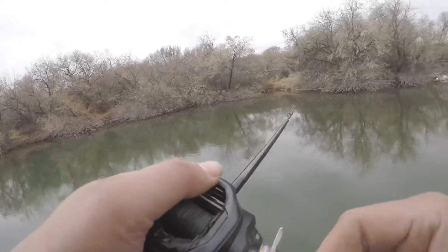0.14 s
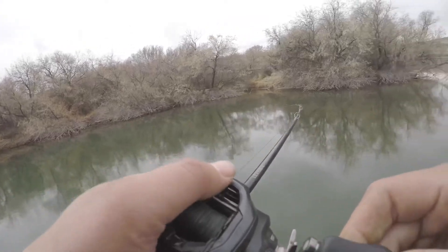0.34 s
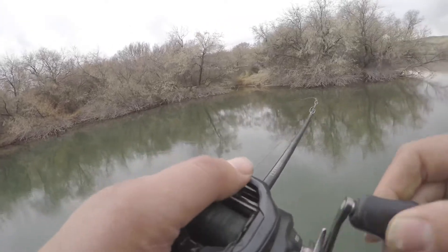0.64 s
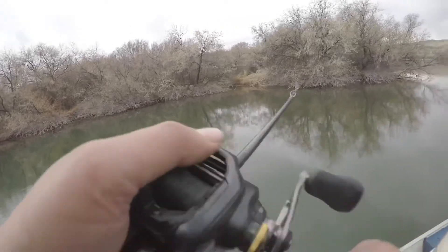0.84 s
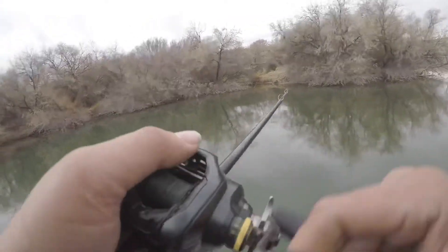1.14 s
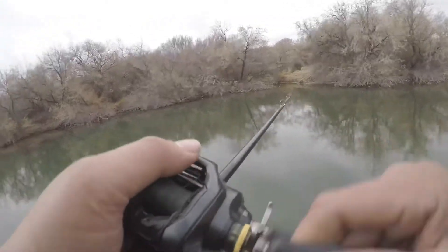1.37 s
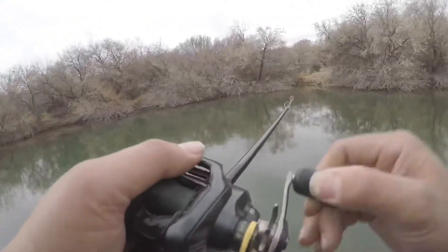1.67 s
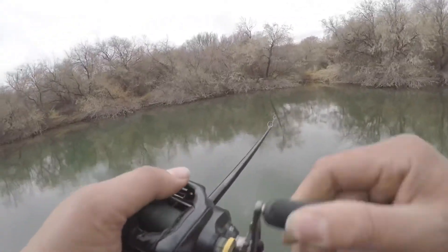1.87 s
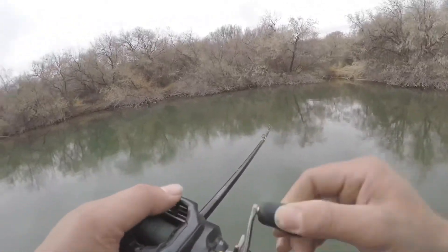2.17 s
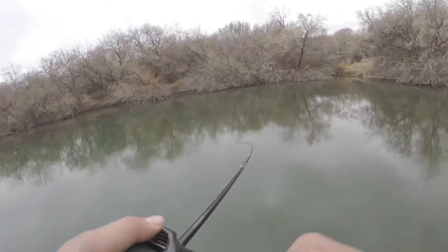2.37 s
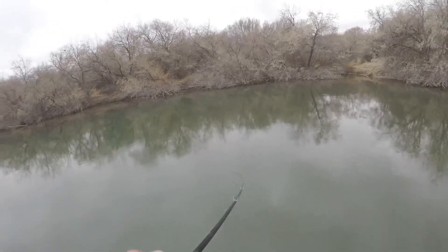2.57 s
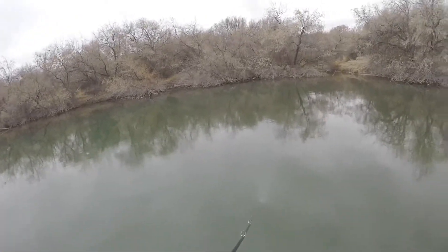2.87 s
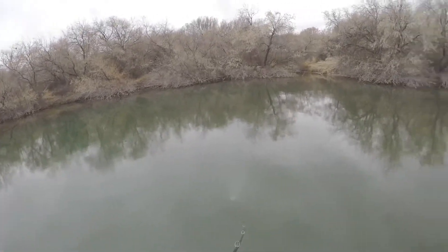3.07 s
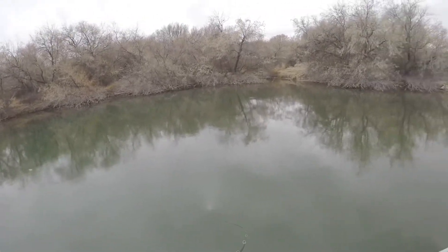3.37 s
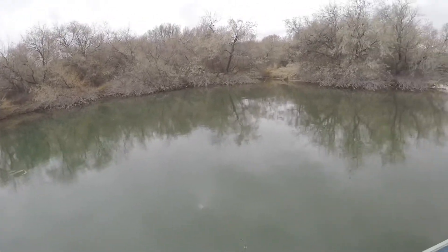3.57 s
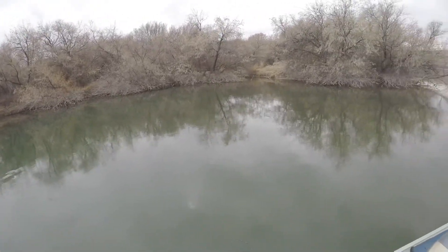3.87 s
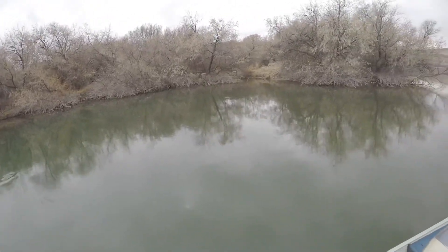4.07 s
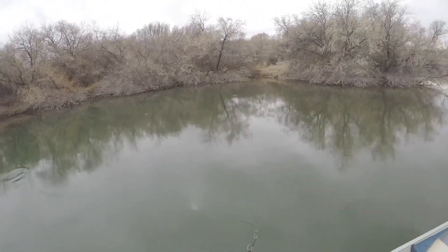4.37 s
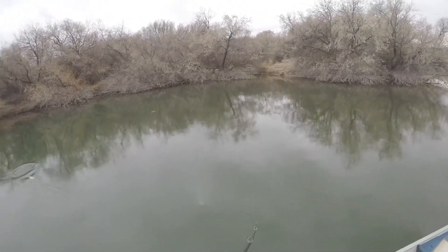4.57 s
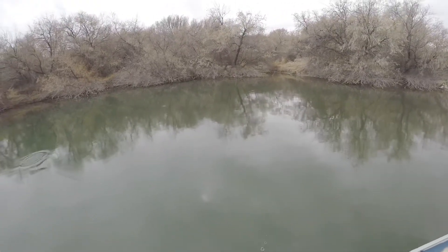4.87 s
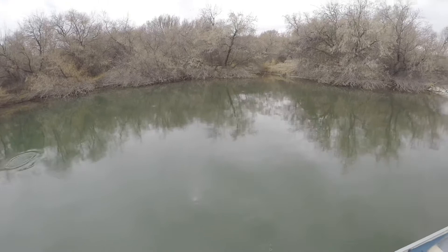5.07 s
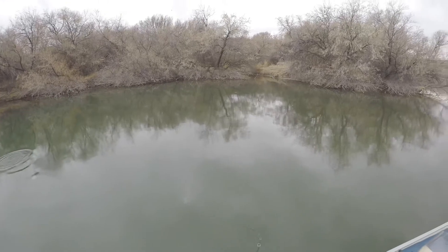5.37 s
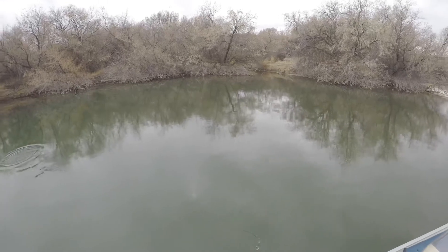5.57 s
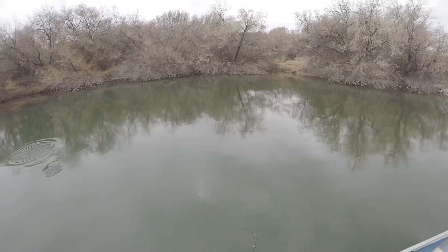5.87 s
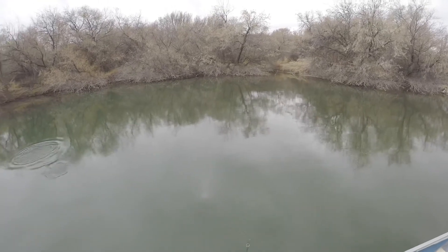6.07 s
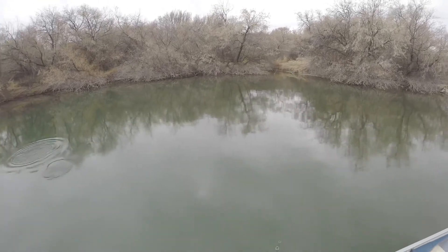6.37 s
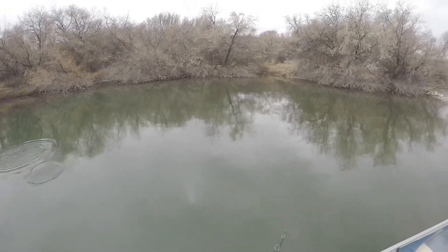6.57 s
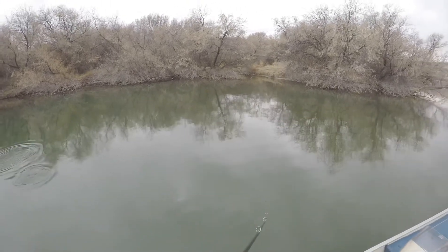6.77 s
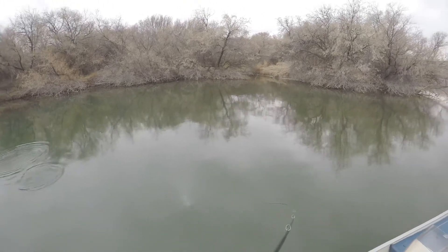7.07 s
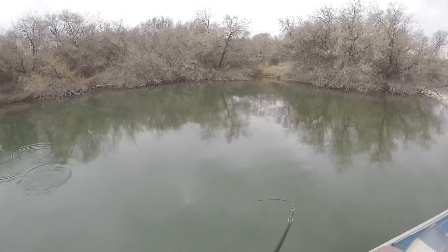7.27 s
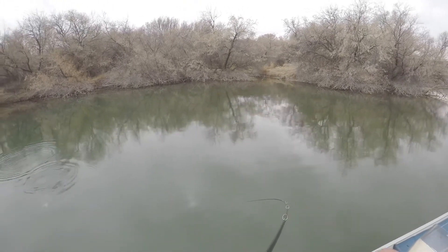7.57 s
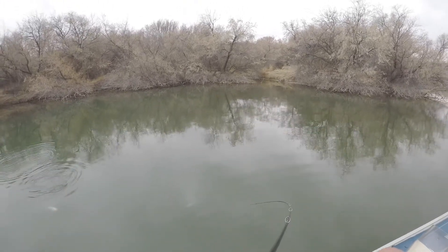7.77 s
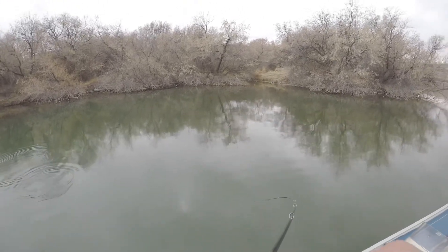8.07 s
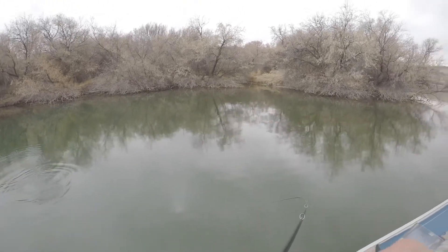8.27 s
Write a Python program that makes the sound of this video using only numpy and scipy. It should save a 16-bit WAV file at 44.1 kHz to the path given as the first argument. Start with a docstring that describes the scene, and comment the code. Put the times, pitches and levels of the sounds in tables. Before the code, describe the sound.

A fishing reel cranks fast with a squealing, grinding whir, then briefly slower, amid wind rumble, clicks, dull knocks and faint birds on quiet water.

```python
"""Fishing reel cranked on a boat

A baitcasting reel is cranked close to the microphone, on a quiet river. Its gear whine is a sine at the
tooth-meshing rate with lower and upper partners, swept by each push and rung through the frame's resonances.
Squeals, pings and a bearing whistle are sines; ticks, rattles, line hiss and scrapes are shaped noise; knocks
mix both. A slower spell of cranking follows the fast one. Gliding sines make the faint birds on the bank and
one rising reel whine at 4.89 s; coloured noise makes the wind rumble, the low roar and the far hiss."""
import sys
import numpy as np
from scipy import signal
from scipy.fft import rfft, irfft, next_fast_len
from scipy.io import wavfile
from scipy.ndimage import uniform_filter1d

SR = 44100
rng = np.random.default_rng(int(sys.argv[2]) if len(sys.argv) > 2 else 0)


def inscribe(sig):
    """Save sig as 16-bit PCM at rate SR to the path in sys.argv[1].

    A 1-D sig is mono; a 2-D sig holds one channel per row.
    Samples are clipped to [-1, 1] before scaling.
    """
    pcm = np.round(np.clip(np.atleast_2d(sig).T, -1, 1) * 32767)
    wavfile.write(sys.argv[1], SR, pcm.astype(np.int16))


N = 371763
T = np.arange(N) / SR  # s
BINS_HZ = abs(np.fft.fftfreq(8192, 1 / SR))

# pushes on the handle: full_speed_s, hold_s, mesh_hz, coast_s (to 1/e)
PUSHES = [(0.613, 0.018, 3590, 0.026), (.684, 0.0055, 5240, 0.035), (.804, 0.011, 5454, 0.047),
          (0.843, 0.017, 6140, .028), (0.933, 0.03, 5287, .04), (1.048, .016, 5600, .035),
          (1.088, 0.016, 5283, 0.03), (1.165, 0.019, 5500, 0.058), (1.286, 0.0027, 6475, 0.021),
          (1.307, 0.03, 5230, 0.029), (1.394, .018, 5440, 0.044), (1.51, 0.011, 5474, 0.061),
          (1.635, 0.0083, 5040, .05), (1.742, .008, 5170, 0.068), (1.891, 0.0044, 5170, .034),
          (2.002, .052, 4365, 0.026), (2.1, .01, 2700, .04), (2.168, 0.0057, 4425, .022),
          (2.275, 0.023, 4237, .04), (2.406, 0.011, 2916, .03), (2.461, .018, 3810, 0.021),
          (4.155, 0.0076, 3750, .045), (4.215, 0.015, 2450, 0.086), (4.3, .02, 2787, .04),
          (4.33, 0.033, 3394, 0.032), (4.409, 0.12, 2750, .075), (5.101, 0.17, 2250, 0.072)]
# gear sound level, set by force on the handle, fast and slow spell: time_s, level_db
FAST_FORCE = [(0.45, -63.5), (.56, -49), (.66, -41.5), (1.35, -40.5), (1.751, -42.5), (2.02, -44.5),
              (2.12, -46), (2.3, -47), (2.51, -48.5), (2.579, -52.5), (2.7, -79)]
SLOW_FORCE = [(3.999, -60), (4.125, -52.5), (4.155, -48.5), (4.58, -52.5), (4.658, -54), (4.95, -56),
              (5.261, -55.5), (5.35, -80)]
# meshing rate between pushes, time to speed up (to 1/e)
FAST_IDLE_HZ, FAST_RISE_S = 2230, .019
SLOW_IDLE_HZ, SLOW_RISE_S = 1706, .035
# pitch of the lower whine and of the grinding, as shares of the meshing rate
LOW_MESH, GRIND_MESH = .46, .76
# reel frame resonances: pitch_hz, width_hz (near the -3.7 dB points), relative_db
FRAME = [(2240, 150, 1), (2344, 72, -0.5), (2673, 16, 3), (3297, 40, -0.5), (3415, 60, 6.5),
         (3656, 62, 2.5), (3935, 230, -4.5), (4160, 41, -2.5), (4527, 47, -0.5), (4820, 45, 0.5),
         (5306, 120, -4.5), (5260, 1150, -8.5), (6050, 45, 0), (6500, 35, -1.5), (6640, 480, -5)]
# reel radiation beside the resonances: freq_hz, relative_db
SHELL = [(300, -63), (700, -9.5), (1400, -15), (1900, -8), (2900, -12.5), (5000, -13), (5800, -44),
         (7500, -15.5), (9700, -19), (11200, -27.5), (13500, -32), (15000, -39)]
# gears catch and squeal: start_s, length_s, level_db, pitch_hz
SQUEALS = [(0.697, 0.03, -43, 2200), (.722, 0.012, -49, 3430), (0.807, 0.01, -41, 2330),
           (0.827, .015, -46, 2280), (0.863, 0.031, -43.5, 2230), (0.887, 0.012, -39.5, 3440),
           (0.935, 0.012, -38.5, 3360), (0.967, 0.027, -43, 2225), (1.074, 0.023, -45, 2313),
           (1.112, 0.015, -42, 2250), (1.124, 0.044, -43.5, 3450), (1.158, .014, -39, 2282),
           (1.285, 0.011, -35.5, 3384), (1.328, .008, -40, 5160), (1.379, .009, -42, 3400),
           (1.64, .014, -44, 2300), (1.663, 0.038, -39, 3484), (1.861, 0.022, -40, 3410),
           (1.893, .02, -55, 2227), (1.909, 0.022, -40.5, 3470), (1.94, 0.046, -40, 3440),
           (2.113, 0.027, -49.5, 2333), (2.21, .03, -54, 2702), (2.316, 0.027, -46, 3430),
           (2.388, 0.027, -55, 2690), (2.427, .018, -50, 3430), (2.458, .022, -54, 3440),
           (2.491, 0.045, -51, 2230), (4.152, 0.017, -44, 3620), (4.228, 0.028, -54, 2250),
           (4.301, .02, -45.5, 2686), (4.424, 0.031, -48, 2770), (4.507, .04, -50, 2730),
           (4.565, 0.037, -51, 2270), (5.065, 0.04, -46, 3480)]
# bearing whistle, mean course: time_s, pitch_hz, level_db
BEARING = [(1.5, 6800, -75), (1.65, 6745, -52.5), (1.78, 6644, -50.5), (2.05, 6550, -59.5),
           (2.52, 6470, -57), (2.65, 6500, -97)]
# spool pings, gain on the rim modes: start_s, gain_db
PINGS = [(2.262, -56), (2.294, -50), (2.334, -51), (2.388, -51), (2.46, -58)]
# spool rim modes: pitch_hz, relative_db, t60_s
RIM = [(10420, -2, 0.038), (14300, -9, 0.023)]
# reel ticks: start_s, peak_db, treble_db (reached at 6.5 kHz)
TICKS = [(0.3065, -36.5, -12), (0.722, -40, 1), (0.8034, -38, -10), (2.878, -39.5, -24), (2.938, -40, -15),
         (4.201, -35, -19), (5.075, -30, -7), (5.078, -31, -8), (5.1786, -37.5, -22), (5.7762, -33.5, -20),
         (5.9202, -37, -15), (6.067, -43, -22), (6.122, -48, -19), (6.3425, -39.5, -27),
         (6.524, -35.5, -11), (6.625, -36, -27), (6.737, -50, -30), (6.975, -41, -12), (7.39, -43, -14),
         (7.8223, -38.5, -23), (7.836, -35, -14), (7.858, -54, -23), (8.034, -49, -6), (8.117, -41, -16)]
# tick spectrum: freq_hz, relative_db
TICK_COLOUR = [(500, -13), (1500, -20.5), (2400, -9), (3500, -11), (4800, -14), (7000, -11), (10000, -25),
               (15000, -37)]
# chance of small rattles: time_s, clicks_per_s
RATTLE_RATE = [(0, 3), (2.5, 8), (3.2, 3), (4, 8), (4.3, 40), (5.2, 30), (5.4, 6), (6, 22), (6.9, 20),
               (8.43, 14)]
# line through the rod guides: middle_s, length_s, level_db
LINE_RUNS = [(2.7, 0.65, -62.5), (4.325, 0.16, -54), (4.521, 0.21, -55.5), (4.763, 0.13, -60.5),
             (4.923, 0.23, -55), (5.245, 0.42, -67), (6.678, 0.26, -56), (7.313, 0.27, -57.5),
             (7.596, 0.14, -63), (8.34, 0.28, -61)]
LINE_REST_DB = -63.5
# wet line hiss spectrum: freq_hz, relative_db
LINE_COLOUR = [(600, 0), (1500, 14), (2300, 8.5), (3000, 7), (4500, 7.5), (5600, -5), (6700, 3),
               (9000, -17), (11000, -21), (15000, -13.5)]
# dull knocks of hands and rod: start_s, peak_db (before the common trim), pitch_hz
KNOCKS = [(2.617, -22.5, 127), (2.73, -28, 185), (2.789, -23.5, 128), (2.829, -30.5, 132),
          (3.034, -25.5, 212.7), (4.082, -25, 164), (4.129, -23.5, 323), (4.145, -23, 195.2),
          (4.915, -31.5, 153), (5.077, -25, 175.5), (6.041, -28.5, 171), (7.562, -28.5, 471),
          (7.864, -26.5, 181), (8.047, -31, 222)]
# spectrum of the rub in a knock: freq_hz, relative_db
KNOCK_COLOUR = [(60, -28), (150, 13.5), (350, 0.5), (600, -21), (1200, -19.5), (2500, -36), (6000, -37),
                (12000, -80)]
# hand scrapes on the grip: start_s, length_s, level_db
SCUFFS = [(2.605, 0.023, -51.5), (2.711, 0.05, -49), (4.126, 0.067, -46.5), (4.887, 0.054, -53)]
# scrape spectrum: freq_hz, relative_db
SCUFF_COLOUR = [(150, -28), (350, 20), (700, -3), (1200, 5.5), (2200, -6), (4000, -12), (9000, -39)]
# gliding whistles, birds on the bank and one rising reel whine at 4.89 s:
# start_s, length_s, level_db (before flutter and echo), start_hz, middle_hz, end_hz
WHISTLES = [(2.62, 0.045, -60.5, 2700, 2520, 2600), (2.9, 0.04, -67.0, 3400, 3700, 4150),
            (2.98, 0.14, -72.5, 4700, 4800, 4950), (3.118, 0.025, -74.5, 5100, 5450, 5500),
            (3.13, 0.035, -67.5, 3850, 3700, 3750), (3.245, 0.028, -70.0, 4150, 4400, 4450),
            (3.266, 0.034, -63.0, 3300, 3520, 3560), (3.298, 0.048, -64.0, 2900, 3180, 3220),
            (3.535, 0.11, -72.5, 6680, 6620, 6560), (4.89, 0.04, -53.0, 1400, 1640, 1780),
            (5.223, 0.054, -66, 4650, 5400, 6500), (5.27, 0.04, -60.5, 1750, 1620, 1400),
            (5.27, 0.048, -61.5, 3350, 3780, 3800), (5.398, 0.062, -66.5, 4800, 5350, 5850),
            (5.465, 0.04, -66.0, 2640, 2500, 1900), (5.47, 0.03, -62.0, 1700, 1580, 1400),
            (5.485, 0.035, -69, 3650, 3800, 4050), (5.618, 0.035, -66.5, 3900, 3850, 3550),
            (6.03, 0.028, -58.0, 2290, 2200, 1970), (6.245, 0.035, -69, 3620, 3750, 3820),
            (6.362, 0.025, -63.5, 3320, 3280, 2700), (6.376, 0.037, -53.0, 2710, 2600, 2450),
            (6.41, 0.045, -61.5, 2200, 2000, 1700), (6.47, 0.055, -66, 2120, 1930, 1800),
            (6.945, 0.045, -63.5, 3700, 3870, 3600), (7.02, 0.058, -64.5, 2420, 2270, 1800),
            (7.072, 0.028, -60.5, 2480, 2380, 2300), (7.102, 0.042, -55.5, 2420, 2580, 2560),
            (7.153, 0.025, -62.0, 2600, 2660, 2640), (7.185, 0.035, -64.5, 2560, 2600, 2680),
            (7.22, 0.085, -55.5, 2470, 2450, 2620), (7.325, 0.03, -65, 4050, 4300, 4400),
            (7.505, 0.045, -63.5, 2850, 2920, 2920), (7.54, 0.065, -64.5, 4100, 3980, 3820),
            (7.542, 0.036, -59.0, 2900, 2630, 2100), (7.583, 0.04, -60.0, 2170, 2330, 2650),
            (7.628, 0.032, -60.5, 2380, 2310, 2100), (7.668, 0.055, -63.5, 2280, 2350, 2230),
            (7.672, 0.035, -68.0, 3920, 4010, 4030), (7.773, 0.028, -66.5, 4160, 4030, 3820),
            (8.04, 0.055, -61.5, 2940, 3020, 3030), (8.085, 0.045, -56.0, 3030, 3170, 3080),
            (8.12, 0.033, -56.5, 2800, 2520, 2120), (8.168, 0.042, -59.5, 2430, 2550, 2470),
            (8.208, 0.03, -63.5, 2250, 2150, 1900), (8.356, 0.059, -66, 6400, 6400, 6200)]
# wind strength at the microphone, before gusts: time_s, level_db
WIND = [(0, -31), (.16, -31.5), (.48, -39.5), (.72, -27.5), (1.35, -26), (1.8, -29), (2.6, -35), (3.2, -39),
        (3.85, -48), (4.4, -40), (5.1, -44), (5.5, -48.5), (5.9, -53), (6.2, -41.5), (6.34, -35.5),
        (6.45, -40), (6.8, -39.5), (7.4, -45.5), (7.75, -52), (8.34, -48), (8.43, -27.5)]
# large wind eddies, spectrum: freq_hz, relative_db
BUFFET = [(4, -9), (16, 1.5), (27, -1), (40, -3), (55, -11.5), (80, -19.5), (160, -49), (600, -110)]
# smaller eddies on each gust, spectrum: freq_hz, relative_db
FLUTTER = [(25, -17.5), (50, 0), (80, 4), (110, -2), (160, -12.5), (260, -18), (600, -101)]
# low roar over the river, spectrum: freq_hz, relative_db
ROAR_COLOUR = [(70, -23), (105, -13), (135, 2), (200, -4), (300, -6), (450, -9), (700, -15.5), (1100, -26),
               (2000, -42), (5000, -86)]
# far hiss, spectrum: freq_hz, relative_db
AIR_COLOUR = [(300, 1), (900, -1), (1500, -3), (2500, -4.5), (4000, -11.5), (6000, -13), (8000, -12),
              (10000, -11), (11500, -17.5), (13500, -20), (15000, -46)]
ROAR_DB, AIR_DB = -44.5, -57.5
EDGE_HZ = 15310


def amp(db):
    """Decibels to gain."""
    return 10 ** (np.asarray(db) / 20)


def evened(x):
    """Scales to rms 1."""
    return x / np.sqrt(np.mean(x ** 2) + 1e-20)


def curve(rows):
    """Joins (time_s, value) rows by straight lines."""
    return np.interp(T, *np.transpose(rows))


def add(mix, start_s, sound):
    """Mixes a sound in at start_s."""
    part = mix[max(round(start_s * SR), 0):][:len(sound)]
    part += sound[:len(part)]


def shape(points):
    """Gain per bin from (freq_hz, db) points, straight in log frequency."""
    hz, db = np.transpose(points)
    return amp(np.interp(np.log(BINS_HZ + 1), np.log(hz), db))


def causal(x, gain):
    """Minimum-phase filter with the given gain per bin."""
    spectrum = np.exp(np.conj(signal.hilbert(np.log(gain + 1e-6))))
    taps = np.fft.ifft(spectrum).real
    return signal.oaconvolve(x, taps[:len(taps) // 2])[:len(x)]


def colour(x, points):
    """Filters x to the (freq_hz, db) shape."""
    return causal(x, shape(points))


def noise(points):
    """Coloured noise of rms 1."""
    return evened(colour(rng.standard_normal(N), points))


def wander(rate_hz):
    """Smooth random drift of rms 1, 12 dB down at rate_hz."""
    size = next_fast_len(N)
    hz = np.fft.rfftfreq(size, 1 / SR)
    lowpass = 1 / (1 + (hz / rate_hz) ** 2) ** 2
    return evened(irfft(rfft(rng.standard_normal(size)) * lowpass, size)[:N])


def meshing(idle_hz, rise_s, roundness=1.2):
    """Meshing rate in Hz: each push speeds the gears up, holds them, lets them coast back."""
    surges = []
    for s, hold_s, hz, coast_s in PUSHES:
        away = np.maximum((s - T) / rise_s, (T - s - hold_s) / coast_s)
        surges.append((hz - idle_hz) * np.exp(-np.clip(away, 0, 8) ** roundness))
    return idle_hz + np.maximum(np.max(surges, 0), 0)


def frame(x, shell_db):
    """Rings the fixed resonances of the reel frame over the broad sound of its shell."""
    power = (amp(shell_db) * shape(SHELL)) ** 2
    for hz, width_hz, db in FRAME:
        power = power + amp(db) ** 2 / (1 + ((BINS_HZ - hz) / (0.69 * width_hz)) ** 2) ** 2
    return causal(x, np.sqrt(power))


def gears(mesh_hz, force, rattle_db, half_db, octave_db, hum_db, jitter, push, grit_db, shell_db,
          slip_db, slip_hz, bite_hz, wobble, grind_db):
    """Uneven teeth whine at the meshing rate and rattle; both sweep through the frame resonances."""
    phase = 2 * np.pi * np.cumsum(mesh_hz * (1 + jitter * wander(452.7))) / SR
    shaft = phase / 7
    # the teeth keep losing contact
    whine = np.sin(phase) * evened(amp(slip_db * np.tanh(2 * wander(slip_hz))))
    # an off-centre wheel throws ragged side tones
    whine *= 1 + wobble * np.sin(shaft + 2 * wander(140))
    whine += amp(octave_db) * np.sin(2 * phase + 3.3 * wander(780))
    # fitful grinding below the whine
    grind = np.sin(GRIND_MESH * phase + 5 * wander(257)) * evened(amp(5.8 * wander(86)))
    whine += amp(grind_db) * grind
    # slow teeth mostly rattle
    whine *= np.minimum(mesh_hz / bite_hz, 1) ** 3
    # a slower wheel whines lower
    low_whine = np.sin(LOW_MESH * phase + 1.13 * wander(450)) * amp(3.34 * wander(81))
    whine += amp(half_db) * low_whine
    # the wheel itself hums below
    whine += amp(hum_db) * np.sin(shaft + wander(150))
    # as the hand slows, the whine sinks into the rattle
    pace_hz = uniform_filter1d(mesh_hz, size=14000)
    whine *= pace_hz / pace_hz.max()
    rattle = evened(rng.standard_normal(N) * amp(grit_db * wander(1500)))
    # louder on each push
    drive = (whine + amp(rattle_db) * rattle) * (mesh_hz / uniform_filter1d(mesh_hz, size=7000)) ** push
    sound = frame(drive, shell_db)
    # level out slow swells, then follow the force
    sound /= np.sqrt(uniform_filter1d(sound ** 2, size=10000) + 1e-12)
    in_spell = (T > force[0][0]) & (T < force[-1][0])
    turning = uniform_filter1d(1. * in_spell, size=1500)
    return sound * amp(curve(force)) * turning


def squeals(waver=0.019):
    """Short, nearly pure squeals near frame resonances as the gears catch."""
    out, unsteady = np.zeros(N), 1 + waver * wander(340)
    for s, length_s, db, hz in SQUEALS:
        # catches quickly, lets go slowly
        swell = np.sin(np.pi * np.sqrt(np.linspace(0, 1, int(length_s * SR))))
        phase = 2 * np.pi * np.cumsum(hz * unsteady[int(s * SR):][:len(swell)]) / SR
        add(out, s, amp(db) * evened(swell * np.sin(phase)))
    return out


def bearing(waver=0.056):
    """The spool bearing sings: a thin high sine, fuzzed by random pitch and level."""
    s, hz, db = np.transpose(BEARING)
    pitch_hz = np.interp(T, s, hz) * (1 + waver * wander(496.4))
    phase = 2 * np.pi * np.cumsum(pitch_hz) / SR
    level_db = np.interp(T, s, db) + 3.04 * wander(90.4)
    return np.sin(phase) * amp(level_db) * (T > s[0]) * (T < s[-1])


def pings():
    """The spool rim rings briefly in very high decaying modes."""
    out, t = np.zeros(N), np.arange(SR // 12) / SR
    ring = sum(amp(db - 60 * t / t60_s) * np.sin(2 * np.pi * hz * t) for hz, db, t60_s in RIM)
    for s, db in PINGS:
        add(out, s, amp(db) * ring)
    return out


def ticks(t60_s=0.034, ring_t60_s=0.054, ring_db=-19):
    """Short noise snaps inside the reel, faintly ringing the frame's strongest resonance."""
    out, t = np.zeros(N), np.arange(SR // 12) / SR
    ring_hz = max(FRAME, key=lambda mode: mode[2])[0]
    ring = np.sin(2 * np.pi * ring_hz * t) * amp(-60 * t / ring_t60_s)
    for s, db, treble_db in TICKS:
        snap = colour(rng.standard_normal(len(t)) * amp(-60 * t / t60_s), TICK_COLOUR)
        snap = colour(snap, [(3800, 0), (6500, treble_db)])
        tick = snap / abs(snap).max() + amp(ring_db) * ring
        add(out, s, amp(db) * tick / abs(tick).max())
    return out


def rattles(gain_db=-35, spread_db=3, t60_s=0.017):
    """Loose parts of the reel click faintly at random: decaying noise through the frame."""
    loudness_db = spread_db * np.minimum(rng.exponential(1, N), 2)
    clicks = (rng.random(N) < curve(RATTLE_RATE) / SR) * amp(loudness_db)
    t = np.arange(SR // 30) / SR
    bursts = signal.oaconvolve(clicks, amp(-60 * t / t60_s))[:N] * rng.standard_normal(N)
    dulled = colour(bursts, [(2300, -6.0), (4500, -22.0), (9000, -28)])
    return amp(gain_db) * frame(dulled, 2.3)


def line():
    """Wet line hisses unevenly through the guides, swelling and fading with each run."""
    power = amp(LINE_REST_DB) ** 2
    for s, length_s, db in LINE_RUNS:
        power = power + amp(db) ** 2 * np.exp(-np.minimum((2 * (T - s) / length_s) ** 2, 20))
    return noise(LINE_COLOUR) * np.sqrt(power) * amp(2.7 * wander(40))


def knocks(scuff=0.84, trim_db=-2, t60_s=0.13, attack_s=0.00051):
    """A damped low thud with a scuff of skin on the grip."""
    out, t = np.zeros(N), np.arange(SR // 5) / SR
    envelope = amp(-60 * t / t60_s) * (1 - np.exp(-t / attack_s))
    for s, db, hz in KNOCKS:
        rub = evened(colour(rng.standard_normal(len(t)), KNOCK_COLOUR))
        thud = (np.sin(2 * np.pi * hz * t) + scuff * rub) * envelope
        add(out, s, amp(db + trim_db) * thud / abs(thud).max())
    return out


def scuffs(grain_db=3):
    """The shifting hand scrapes briefly: swells of grainy coloured noise."""
    swell = np.zeros(N)
    for s, length_s, db in SCUFFS:
        add(swell, s, amp(db) * evened(np.sin(np.linspace(0, np.pi, int(length_s * SR)))))
    return swell * evened(noise(SCUFF_COLOUR) * amp(grain_db * wander(400)))


def whistles(waver=0.014, echo_db=-4, echo_t60_s=0.08, flutter_db=2.5):
    """Gliding sines, birds and one reel whine, all smeared by a short tail like scatter in trees."""
    out, unsteady = np.zeros(N), 1 + waver * wander(490)
    for s, length_s, db, *pitches_hz in WHISTLES:
        u = np.linspace(0, 1, int(length_s * SR))
        glide_hz = np.polyval(np.polyfit([0, .5, 1], pitches_hz, 2), u)
        glide_hz = glide_hz * unsteady[int(s * SR) - len(u):int(s * SR)]
        tone = np.sin(2 * np.pi * np.cumsum(glide_hz) / SR)
        add(out, s, amp(db) * evened(tone * np.sqrt(u * (1 - u))))
    out *= evened(amp(flutter_db * wander(180)))
    t = np.arange(SR // 2) / SR
    tail = rng.standard_normal(len(t)) * amp(-60 * t / echo_t60_s)
    return out + amp(echo_db) * signal.oaconvolve(out, tail / np.linalg.norm(tail))[:N]


def wind(flutter_db=-47, follow=0.63, gust_db=5.5, gust_hz=7):
    """Large eddies buffet the microphone with each gust; smaller ones swell less."""
    wind_db = curve(WIND) + gust_db * np.tanh(wander(gust_hz))
    eddies = noise(BUFFET)
    eddies /= np.sqrt(uniform_filter1d(eddies ** 2, size=6000) + 1e-9)
    small_db = flutter_db + follow * (wind_db - wind_db.mean())
    return eddies * amp(wind_db) + noise(FLUTTER) * amp(small_db)


def river_air():
    """A lumpy low roar of breeze and water under a smooth far hiss, both coloured noise."""
    roar_db = ROAR_DB + 0.14 * wander(29.0) + 0.98 * wander(70)
    return noise(ROAR_COLOUR) * amp(roar_db) + amp(AIR_DB) * noise(AIR_COLOUR)


def scene():
    """The reel, the whistles and the weather, in one channel."""
    fast = gears(meshing(FAST_IDLE_HZ, FAST_RISE_S), FAST_FORCE,
                 rattle_db=.3, half_db=-2.7, octave_db=-7, hum_db=-8, grind_db=-4.5,
                 jitter=.042, push=.6, grit_db=3.2, shell_db=3.5,
                 slip_db=7.5, slip_hz=115, bite_hz=3400, wobble=.6)
    slow = gears(meshing(SLOW_IDLE_HZ, SLOW_RISE_S), SLOW_FORCE,
                 rattle_db=-3.5, half_db=-15, octave_db=-20, hum_db=-22, grind_db=-13,
                 jitter=.045, push=1.0, grit_db=2.5, shell_db=6.5,
                 slip_db=5.5, slip_hz=70, bite_hz=2300, wobble=.7)
    reel = fast + slow + squeals() + bearing() + pings() + ticks() + rattles()
    handling = line() + knocks() + scuffs()
    return (reel + handling + whistles() + wind() + river_air())[None]


def record(dry):
    """The recorder's band limit: a steep low-pass at EDGE_HZ."""
    taps = signal.firwin(511, EDGE_HZ, window=("kaiser", 9), fs=SR)
    return signal.oaconvolve(dry, taps[None], "same")


dry = scene()
out = record(dry)
inscribe(out)
```